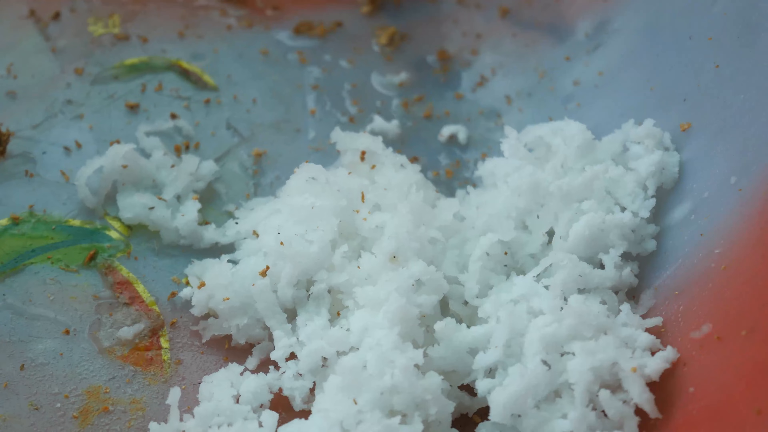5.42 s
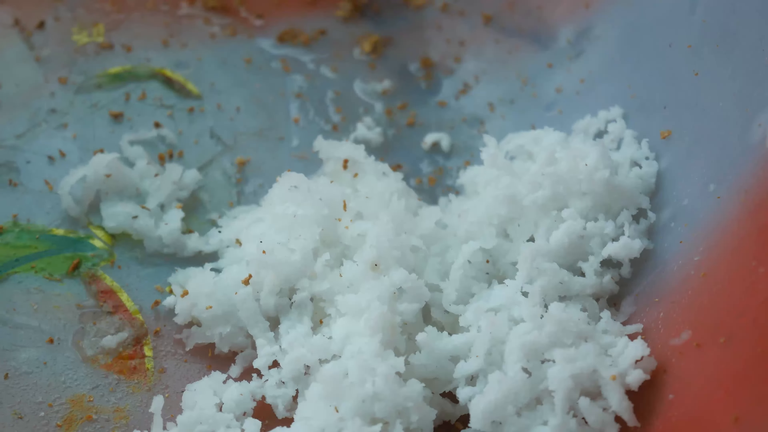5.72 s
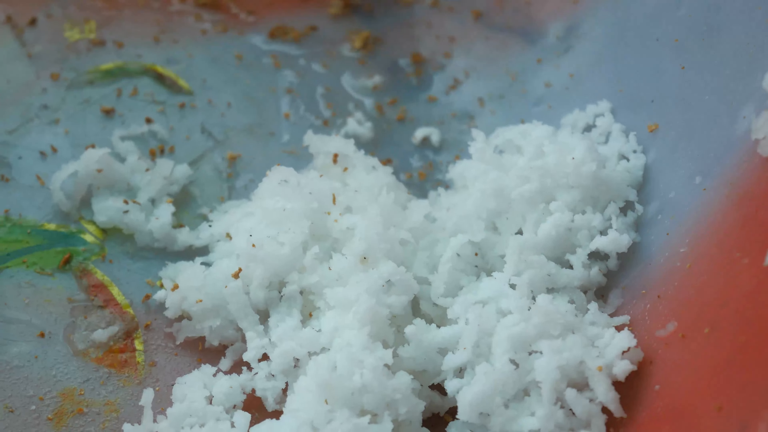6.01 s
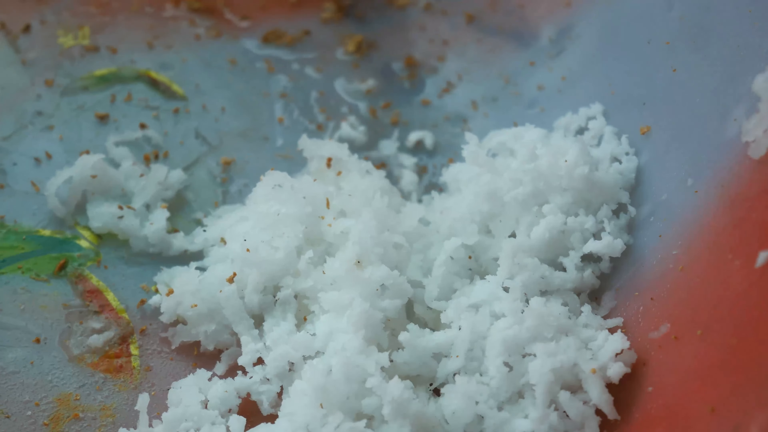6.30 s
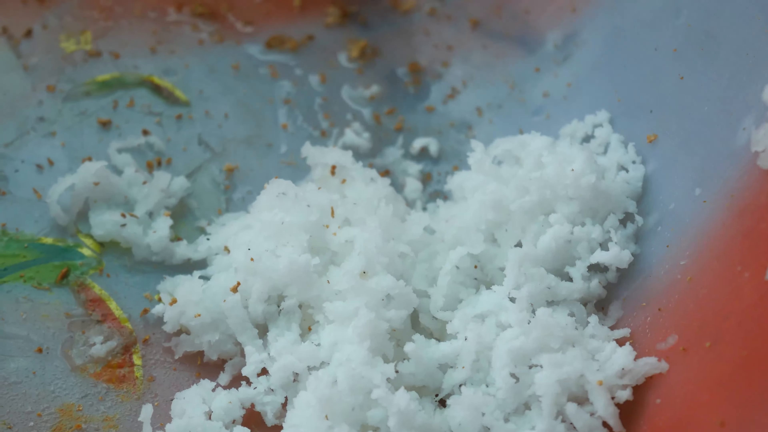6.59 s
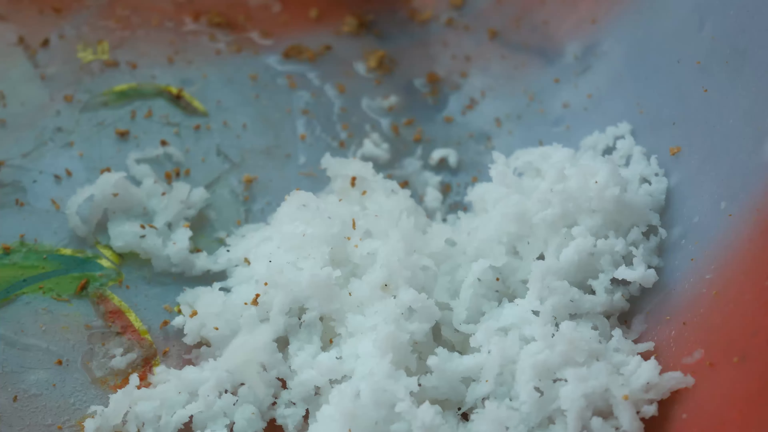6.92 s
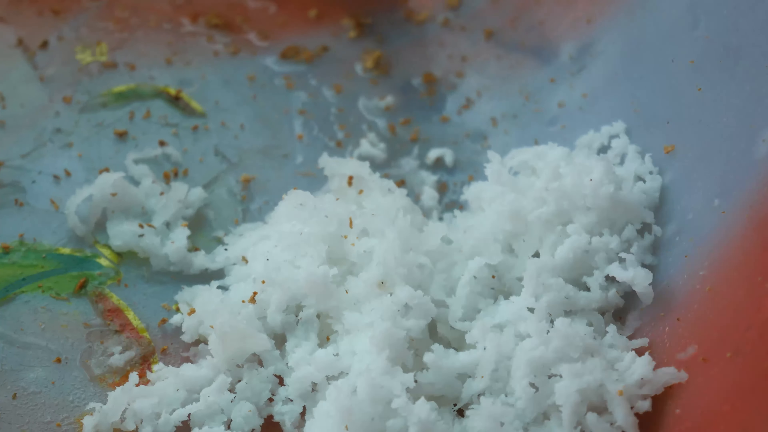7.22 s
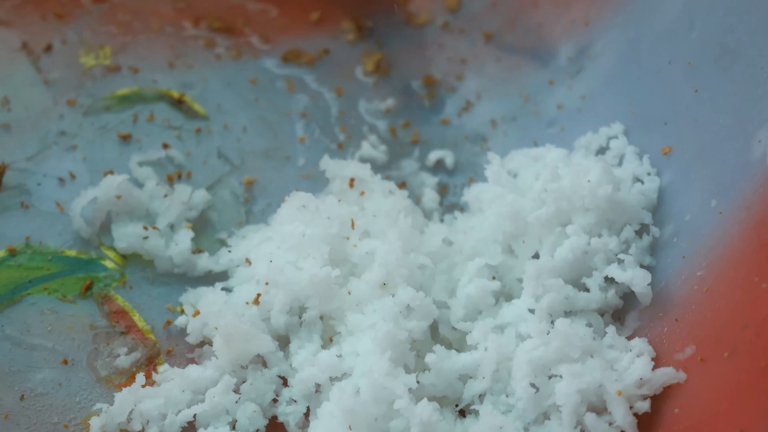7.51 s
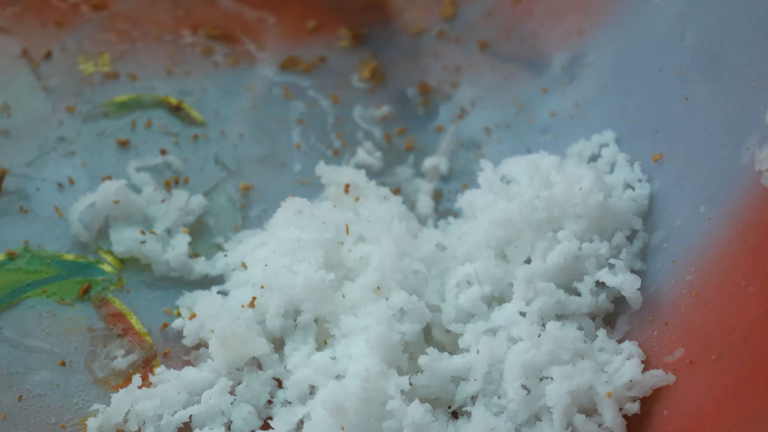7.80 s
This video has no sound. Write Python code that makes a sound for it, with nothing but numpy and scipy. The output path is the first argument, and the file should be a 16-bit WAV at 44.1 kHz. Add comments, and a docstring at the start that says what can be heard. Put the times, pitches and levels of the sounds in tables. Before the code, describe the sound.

Half a coconut is scraped by hand over a toothed steel grater, close to the microphone outdoors. Hard, crunchy rasps come about twice a second, with lighter slides back between them. After a brief silence the grating resumes brighter and a little louder. The blade occasionally ticks on the shell, and the shell gives a few dull knocks. A faint low rumble lies underneath, and a soft hum swells near the end.

```python
"""Half a coconut is scraped by hand over a toothed steel grater, close by and outdoors.
Twice a second a hard stroke tears the flesh and a light one slides back. Tiny snapping fibres make
the rasp, and the shell, the blade and the grater's seat ring. Now and then the blade ticks on the shell
or the shell bumps the grater. After a short silence the grating goes on, brighter.
A low outdoor rumble lies underneath, and a hum swells and fades behind the later strokes."""
import sys
import numpy as np
from scipy import signal
from scipy.fft import rfft, irfft
from scipy.io import wavfile
from scipy.ndimage import uniform_filter1d

SR = 44100
rng = np.random.default_rng(int(sys.argv[2]) if len(sys.argv) > 2 else 0)


def log_audio(samples):
    """Write samples as a 16-bit WAV file to the path given in sys.argv[1]."""
    # one column per channel
    frames = np.atleast_2d(samples).T
    # limit to full scale, then quantise
    limited = np.clip(frames, -1, 1)
    pcm = np.round(limited * 32767).astype(np.int16)
    wavfile.write(sys.argv[1], SR, pcm)


N = 350595
TIME = np.arange(N) / SR
HZ = np.fft.rfftfreq(4096, 1 / SR)
SILENCE_S = (2.984, 3.2055)

# A scrape has three layers: rasp (tearing fibres), push (shaken shell) and spray (the finest fibres).
# Levels in the tables are relative: they say how loud one row is next to another.
# Hard strokes. Each row: start and length in seconds, then rasp, push and spray levels in dB.
HARD_STROKES = [(0.304, 0.21, -25, -18.5, -31.5), (0.815, 0.19, -23.5, -17, -31),
                (1.306, 0.2, -26.5, -18.5, -31.5), (1.82, 0.19, -25.5, -18.5, -30),
                (2.338, 0.23, -27.5, -20.5, -34.0), (2.87, 0.15, -24, -16.5, -29.5),
                (3.288, 0.24, -20.0, -18.5, -25), (3.854, 0.21, -21, -17.5, -26.5),
                (4.42, 0.233, -20, -18, -26), (4.958, 0.25, -20, -18.5, -24.5),
                (5.484, 0.222, -22.0, -18, -27), (6.102, 0.28, -22.5, -19, -26),
                (6.668, 0.228, -21, -17.5, -25.5), (7.184, 0.19, -20, -17.5, -26),
                (7.634, 0.18, -19, -16, -26.5)]
# Light strokes back. Each row: peak time, build-up and fade in seconds, then rasp, push and spray in dB.
BACK_STROKES = [(0.182, 0.042, 0.088, -33, -26.5, -38.0), (0.721, 0.11, 0.069, -30, -26, -37.5),
                (1.126, 0.052, 0.027, -42, -37, -53.5), (1.181, 0.031, 0.078, -34.5, -30, -43),
                (1.694, 0.091, 0.087, -32, -27, -39), (2.188, 0.075, 0.13, -30.5, -26.0, -40),
                (2.773, 0.16, 0.069, -35, -29, -41.0), (3.21, 0.02, 0.072, -33, -31.5, -39.5),
                (3.745, 0.088, 0.12, -24, -23, -31), (4.255, 0.13, 0.18, -36.5, -36, -43),
                (4.847, 0.11, 0.11, -33, -32.5, -37.5), (5.427, 0.15, 0.052, -27, -26, -34),
                (5.906, 0.078, 0.04, -31.5, -32, -39), (6.019, 0.072, 0.015, -32, -28.5, -36.5),
                (6.497, 0.078, 0.014, -35, -37.0, -43.5), (6.588, 0.062, 0.072, -30, -26, -35.5),
                (7.081, 0.058, 0.017, -26.5, -28, -34.5), (7.133, 0.039, 0.036, -28, -24, -36),
                (7.519, 0.11, 0.071, -38.5, -38, -46), (7.602, 0.054, 0.02, -38.5, -36, -44),
                (7.935, 0.024, 0.017, -36, -37.5, -45)]
# A hard stroke's shape: before the silence it leans in, afterwards it bites and eases off.
# Each row (rasp, push, spray): rise in seconds, sag in dB a second (negative grows), release in seconds.
STROKE_SHAPE_BEFORE = [(0.051, -11.5, 0.13), (.066, -36.5, 0.16), (.046, 0.5, 0.15)]
STROKE_SHAPE_AFTER = [(0.048, 31.7, 0.18), (0.066, 6.9, 0.15), (.044, 77, 0.09)]
TOUCH_DB, LIFT_DB = -28.5, -20.5  # a hard stroke's start and any stroke's end, next to its full level
RELEASE_CURVE, RETURN_CURVE = 3.54, 1.8  # higher makes hard and light strokes end more sharply
# Light rubbing between strokes: rasp, push and spray levels in dB.
RUBBING_DB = (-51, -53.5, -59)
TURN_DB, TURN_AFTER_S, TURN_WIDTH_S = -5, .025, 0.047  # the rubbing dips as the hand turns round
# Tough fibres catch. Each row: time in seconds, then the boost to rasp, push and spray in dB.
FIBRE_SNAGS = [(.158, 10, -5, -4), (.232, 3, 16, 10), (.853, -8, 9, 2), (1.168, 9.5, 7.5, 12),
               (1.488, 3, 6, 2), (1.96, 0, 4, -3), (1.995, 3, 5.5, -3), (2.275, 6, 14, 8),
               (2.394, -7, 8, -6), (2.445, 5, 5.5, 2), (2.52, 2, 3, 4), (2.733, 10, 0, 6), (2.937, 3, 7, 3),
               (3.338, -4, -6, 3), (3.387, 8.5, -1, 4.5), (3.492, 7, 11, 6), (3.815, 12, 6, -7),
               (3.962, 7, 5, 8), (4.022, 10, 8.5, 3), (4.48, -6, -16, 12), (4.54, 3, 2, 1),
               (4.595, 7, 10, 10), (4.848, 10, 13, 9), (4.901, 10, 8, 7), (5.382, 11, -1, 0),
               (5.611, 11, 1, -2), (6.35, 7, -6, 11), (6.712, -3, 0, 3), (6.867, 6, 3, 7), (7.057, 3, 2, 1),
               (7.66, -4.5, -3, 6)]
SNAG_RISE_S, SNAG_FADE_S = 0.0053, 0.012
# Tone of fibres and shell, before and after the silence. Each row: frequency in Hz, level in dB.
FIBRE_TONE_BEFORE = [(650, -19.5), (1100, -1), (1850, 0.5), (2160, -5), (2650, -1), (3700, -8), (4400, -7),
                     (6500, -16.5), (9300, -20), (12000, -31), (15500, -43)]
FIBRE_TONE_AFTER = [(650, -28), (1100, -2.5), (1620, 0), (2200, -4.5), (2790, -3), (3700, -11),
                    (4300, -6.5), (6500, -11), (9500, -12.5), (12600, -22), (15500, -32.5)]
SHELL_TONE_BEFORE = [(50, -48.5), (110, -14.5), (160, -24), (205, -1.5), (300, 2.5), (390, -2), (510, -8.5),
                     (640, -5), (800, -5.5), (940, -21.5), (1250, -21.5), (1800, -26.5), (4000, -61.5)]
SHELL_TONE_AFTER = [(50, -32.5), (110, -14.5), (170, -17.5), (245, 1.5), (290, -3), (390, -5), (560, -7),
                    (780, -8.5), (940, -16.5), (1130, -18.5), (1300, -19.5), (1900, -23.5), (4000, -65.5)]
SPRAY_HZ = 5110  # spray takes over from rasp above this
# Ringing of seat, shell and blade. Each row: frequency in Hz, width in Hz, boost in dB.
RESONANCES = [(247.5, 45, -0.5), (587.6, 16, 4.5), (1071, 110, 11.5), (1800, 190, -3.5), (2690, 96, 4),
              (4149, 174, 8), (4340, 180, 0.5), (5350, 250, -3)]
# Small peaks and dips in the tone of each spot on the shell. Each row: frequency in Hz, depth from 0 to 1.
SPOT_RIPPLE = [(250, .5), (1200, 1), (5000, 0.98)]
# Tone of the outdoor rumble. Each row: frequency in Hz, level in dB.
RUMBLE_TONE = [(25, -36), (60, -9.5), (110, 4), (200, -1), (260, -2.5), (330, -19), (500, -15),
               (800, -18.5), (2000, -27), (5000, -42.5), (10000, -29), (15000, -48.5)]
# Loudness of the rumble. Each row: time in seconds, level in dB.
RUMBLE_LEVELS = [(0, -45), (1, -42.5), (1.4, -43), (2.2, -42.5), (3.6, -42.5), (4.2, -44.5), (5.8, -45.5),
                 (6.4, -43.5), (7.9, -42)]
# The blade catches on the shell.
# Each row: time in seconds, level in dB, ring frequency in Hz, ring boost in dB, length in seconds.
BLADE_TICKS = [(.053, -30, 6780, 28, .006), (0.157, -23, 3960, 0, 0.014), (0.291, -29, 3920, 10, 0.014),
               (2.6, -21, 2880, 25, 0.0095), (2.656, -19.5, 7960, 3, 0.014), (2.667, -15, 2880, 7, 0.022),
               (3.208, -18.5, 4200, -3.5, 0.02), (3.603, -34, 6000, 8.5, 0.0065),
               (4.268, -16.5, 1080, 1, 0.019), (4.711, -32.5, 510, 22, 0.017),
               (5.893, -15.5, 2740, 7, 0.026), (5.904, -13.5, 4200, 5.5, 0.023),
               (6.005, -23, 1860, 31, 0.032), (6.525, -14.5, 3140, 3, 0.032),
               (6.975, -24.5, 1270, 9, 0.023), (7.103, -11.5, 1520, 22, 0.019),
               (7.546, -15, 1480, 0, 0.029)]
# The shell bumps the grater. Each row: time in seconds, peak level in dB.
SHELL_BUMPS = [(0.851, -29.5), (4.27, -9.5), (5.522, -11.5), (7.552, -18.5)]
# The notes in a bump. Each row: frequency in Hz, level in dB, seconds to fade by 60 dB (called t60).
THUD_NOTES = [(200, 5.5, 0.035), (282, 10, 0.04), (404, -3.5, 0.11), (1038, -29, 0.063)]
# Tone of the hum. Each row: frequency in Hz, level in dB.
HUM_TONE = [(25, -56), (60, -25), (120, -11), (190, -6.5), (250, -0.5), (300, -5.5), (380, -16.5),
            (700, -47.5)]
# Loudness of the hum. Each row: time in seconds, level in dB.
HUM_LEVELS = [(4.9, -62), (5.25, -41.5), (5.7, -61), (6.1, -36.5), (6.42, -40), (6.9, -52), (7.15, -26.5),
              (7.42, -35.5), (7.62, -38.5), (7.9, -43.5)]
# Balance between two microphones. Each row: frequency in Hz, left minus right in dB.
LEFT_OVER_RIGHT = [(100, 3), (200, -3), (380, -6.5), (700, -7), (1300, -4), (2400, -2), (8000, 0)]
# Scattered sound that differs between the microphones. Each row: frequency in Hz, level in dB.
SCATTER_TONE = [(300, -14), (700, -8.5), (1500, -7.5), (4000, -9.5), (12000, -10.5)]


def amp(db):
    """Turns decibels into a number to multiply by."""
    return 10 ** (np.asarray(db) / 20)


def evened(x):
    """Scales a signal to an average power of 1."""
    return x / np.sqrt(np.mean(x ** 2) + 1e-20)


def curve(points):
    """Joins a table's points into a value for every frequency."""
    hz, value = np.transpose(points)
    return np.interp(np.log(HZ + 1), np.log(hz + 1), value)


def add(mix, s, sound):
    """Lays a sound into the mix, s seconds in."""
    part = mix[round(s * SR):][:len(sound)]
    part += sound[:len(part)]


def colour(x, db):
    """Shapes the tone so that any ringing comes after each click, never before it."""
    log_gain = irfft(np.log(amp(np.maximum(db, -100))))
    half = len(log_gain) // 2
    folded = np.r_[log_gain[0], 2 * log_gain[1:half], np.zeros(half)]
    click_response = irfft(np.exp(rfft(folded)))
    return signal.oaconvolve(x, click_response)[:len(x)]


def wander(rate_hz):
    """A smooth random wobble, up to about the given rate."""
    hz = np.fft.rfftfreq(N, 1 / SR)
    return evened(irfft(rfft(rng.standard_normal(N)) * np.exp(-(hz / rate_hz) ** 2), N))


def snaps(per_s, spread_db):
    """A swarm of tiny clicks of uneven size."""
    size = amp(spread_db * np.minimum(rng.exponential(1, N), 3))
    return evened(size * rng.choice([-1, 1], N) * (rng.random(N) < per_s / SR))


def hand_pressure(layer, shape):
    """The hand presses and eases, setting the level in dB of one layer (0 rasp, 1 push, 2 spray)."""
    attack_s, sag_db_per_s, release_s = shape[layer]
    turning = sum(np.exp(-((TIME - start - length - TURN_AFTER_S) / TURN_WIDTH_S) ** 2)
                  for start, length, *_ in HARD_STROKES)
    power = amp(RUBBING_DB[layer] + TURN_DB * turning) ** 2
    t = TIME[:SR // 2]
    for start, length, *levels in HARD_STROKES:
        attack = TOUCH_DB * np.maximum(1 - t / attack_s, 0) ** 2
        sag = sag_db_per_s * np.maximum(t - attack_s, 0)
        release = LIFT_DB * np.maximum(1 + (t - length) / release_s, 0) ** RELEASE_CURVE
        add(power, start, amp(levels[layer] + attack - sag + release) ** 2)
    for peak, build, fade, *levels in BACK_STROKES:
        start = max(peak - 2 * build, 0)
        from_peak = np.maximum((peak - start - t) / build, (start + t - peak) / fade)
        add(power, start, amp(levels[layer] + LIFT_DB * from_peak ** RETURN_CURVE) ** 2)
    return 10 * np.log10(power) + snags(layer)


def snags(layer):
    """Tough fibres grip and tear free, making one layer's level in dB jump or dip."""
    out, t = np.zeros(N), TIME[:SR // 8]
    for s, *boosts in FIBRE_SNAGS:
        add(out, s, boosts[layer] * np.minimum(t / SNAG_RISE_S, 1) * np.exp(-(t / SNAG_FADE_S) ** 2))
    return out


def grating(shape, fibre_tone, shell_tone, rasp_db, push_db, spray_db):
    """The teeth stick and slip: fibres snap in swarms, and coarser jerks shake the shell."""
    toughness_db = 0.96 * wander(rate_hz=25.7)  # the flesh is tougher in patches
    rasp_level, push_level, spray_level = (hand_pressure(i, shape) + toughness_db for i in range(3))
    grip = amp(1.4 * wander(rate_hz=130))
    jerks = snaps(per_s=2000, spread_db=1.8)
    tearing = grip * (snaps(per_s=10000, spread_db=2.2) + .3 * jerks)
    spitting = grip * amp(wander(rate_hz=200)) * snaps(per_s=18000, spread_db=2)
    fineness = (HZ / SPRAY_HZ + 1e-6) ** 8
    rasp = evened(colour(tearing, curve(fibre_tone) - 10 * np.log10(1 + fineness)))
    spray = evened(colour(spitting, curve(fibre_tone) - 10 * np.log10(1 + 1 / fineness)))
    push = evened(colour(grip * jerks, curve(shell_tone)))
    scrape = amp(rasp_level + rasp_db) * rasp
    scrape += amp(spray_level + spray_db) * spray
    scrape += amp(push_level + push_db) * push
    # the harder the teeth dig in, the more blade and shell ring
    pressed = np.interp(rasp_level, [-42, -22], [.2, 1])
    ring_db = sum(db / (1 + (2 * (HZ - hz) / width) ** 2) for hz, width, db in RESONANCES)
    return scrape * (1 - pressed) + colour(scrape * pressed, ring_db)


def shell_spots(x, t60, spots_per_s, count=23):
    """The blade travels over the shell, and each spot rings with a tone of its own."""
    t, out = TIME[:2 * len(HZ) - 2], np.zeros(N)
    for spot in range(count):
        distance = abs((TIME * spots_per_s - spot + count / 2) % count - count / 2)
        touching = np.cos(np.pi / 2 * np.minimum(distance, 1)) ** 2
        ring_power = abs(rfft(rng.standard_normal(len(t)) * amp(-60 * t / t60))) ** 2
        ripple_db = 10 * np.log10(ring_power / np.mean(ring_power) + .3)
        ripple_db = (ripple_db - uniform_filter1d(ripple_db, size=90)) * curve(SPOT_RIPPLE)
        humps = evened(uniform_filter1d(rng.standard_normal(len(HZ)), size=80))
        broad_db = 1.7 * humps * np.minimum(HZ / 2500, 1)
        out += colour(x * touching, ripple_db + broad_db)
    return out


def outdoor_rumble(side_db):
    """A low, wavering rumble, partly alike on the left and right."""
    both, side = (evened(colour(rng.standard_normal(N), curve(RUMBLE_TONE))) for _ in range(2))
    side *= amp(side_db)
    level_db = np.interp(TIME, *np.transpose(RUMBLE_LEVELS)) + 1.8 * wander(rate_hz=4)
    return amp(level_db) * np.array([both + side, both - side])


def blade_ticks(level_db):
    """A tooth skids over hard shell: a short burst of grit with one broad ring."""
    out, t = np.zeros(N), TIME[:SR // 10]
    grit_db = curve([(150, -8.5), (500, 5), (3000, -2.5), (9000, -8.5), (15000, -23.5)])
    for s, db, hz, boost_db, length in BLADE_TICKS:
        burst = rng.choice([-1, 1], len(t)) * (t / length) * amp(-60 * t / length)
        ring_db = boost_db / (1 + (np.log(HZ / hz + 1e-6) / .28) ** 4)
        tick = colour(burst, grit_db + ring_db)
        add(out, s, amp(db + level_db) * tick / abs(tick).max())
    return out


def shell_bumps():
    """The shell knocks on the grater, whose seat thuds but is too small to give off deep bass."""
    out, t = np.zeros(N), TIME[:SR // 4]
    thud = sum(amp(db - 60 * t / t60) * np.sin(2 * np.pi * hz * t) for hz, db, t60 in THUD_NOTES)
    thud = signal.sosfilt(signal.butter(2, 150, "high", fs=SR, output="sos"), thud)
    for s, db in SHELL_BUMPS:
        add(out, s, -amp(db) * thud / abs(thud).max())
    return out


def hum():
    """A narrow band of low noise that comes and goes."""
    noise = evened(colour(rng.standard_normal(N), curve(HUM_TONE)))
    return amp(np.interp(TIME, *np.transpose(HUM_LEVELS))) * noise


def reflections(x, t60):
    """Many quick echoes from the bowl and nearby surfaces."""
    t = TIME[:SR // 3]
    echoes = rng.standard_normal(len(t)) * amp(-60 * t / t60) * (t > .001)
    return signal.oaconvolve(x, echoes / np.linalg.norm(echoes))[:N]


def scattered(x, t60, count=3):
    """Shell and hands throw sound sideways, along paths that change as they move."""
    paths = [np.cos(2 * np.pi * (TIME * 5 + k / count)) for k in range(count)]
    return np.sqrt(2 / count) * sum(reflections(x * path, t60) for path in paths)


def microphone(x, db):
    """Sets how strongly one microphone hears each frequency, adding no delay."""
    return signal.oaconvolve(x, np.fft.fftshift(irfft(amp(db)))[1:], "same")


def scene():
    """The grater sits a little to the right, among close surfaces."""
    before = grating(STROKE_SHAPE_BEFORE, FIBRE_TONE_BEFORE, SHELL_TONE_BEFORE,
                     rasp_db=-2.0, push_db=0, spray_db=0)
    after = grating(STROKE_SHAPE_AFTER, FIBRE_TONE_AFTER, SHELL_TONE_AFTER,
                    rasp_db=-2.5, push_db=-1.5, spray_db=-0.5)
    strokes = np.where(TIME < np.mean(SILENCE_S), before, after)
    mix = shell_spots(strokes, t60=0.025, spots_per_s=20)
    mix += blade_ticks(level_db=-1.0) + shell_bumps() + hum()
    mix += amp(-22.5) * reflections(mix, t60=0.31)
    side = colour(scattered(mix, t60=.04), curve(SCATTER_TONE))
    lean_db = curve(LEFT_OVER_RIGHT) / 2
    left, right = microphone(mix + side, lean_db), microphone(mix - side, -lean_db)
    return np.array([left, right]) + outdoor_rumble(side_db=-5.5)


def record(dry):
    """Rounds off the tallest peaks, mutes the short silence and removes the highest treble."""
    sound_on = uniform_filter1d(1. * ((TIME < SILENCE_S[0]) | (TIME > SILENCE_S[1])), size=40)
    rounded = dry / (1 + (dry / .85) ** 8) ** (1 / 8)
    low_pass = signal.firwin(401, cutoff=15700, window=("kaiser", 8), fs=SR)
    return signal.oaconvolve(rounded * sound_on, low_pass[None], "same")


dry = scene()
out = record(dry)
log_audio(out)
```